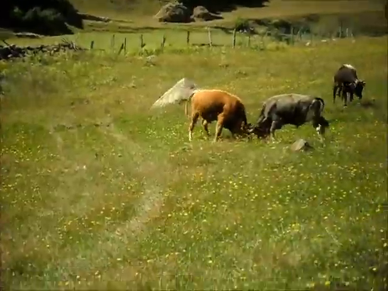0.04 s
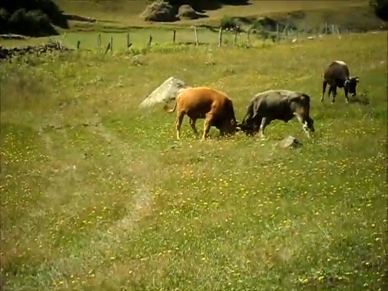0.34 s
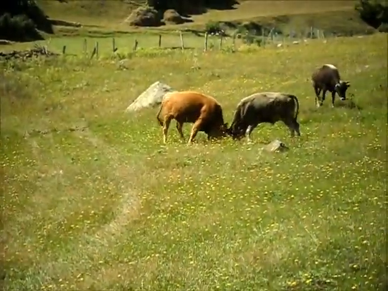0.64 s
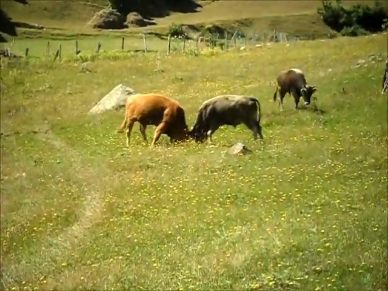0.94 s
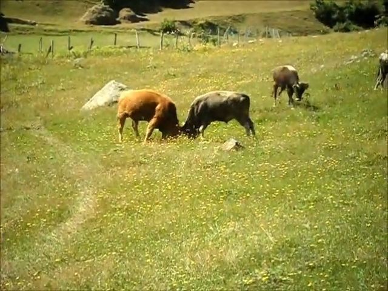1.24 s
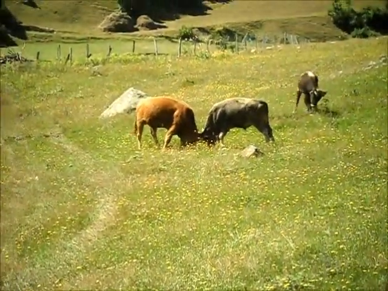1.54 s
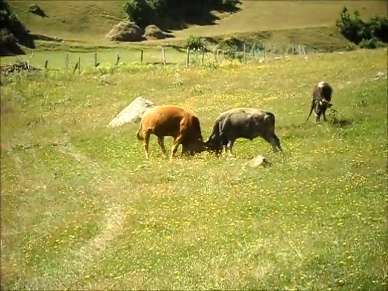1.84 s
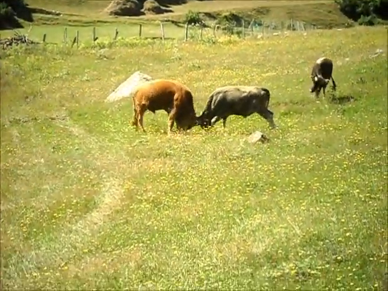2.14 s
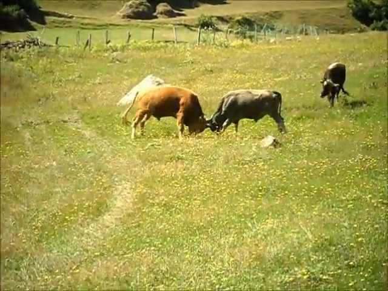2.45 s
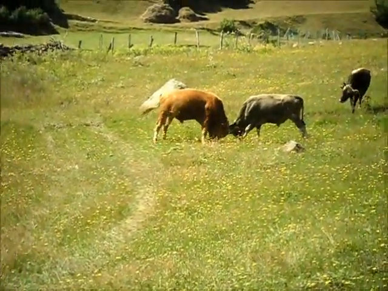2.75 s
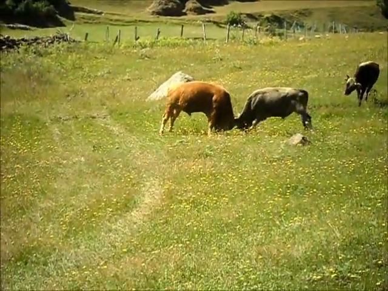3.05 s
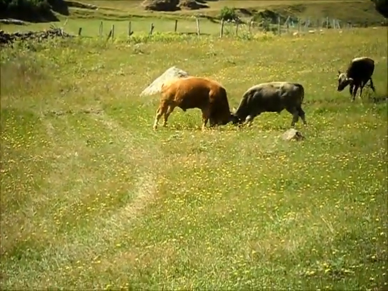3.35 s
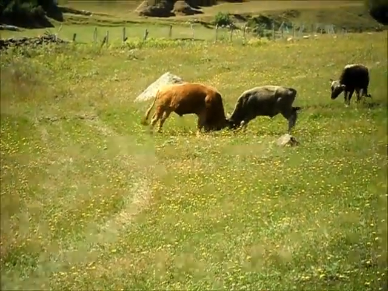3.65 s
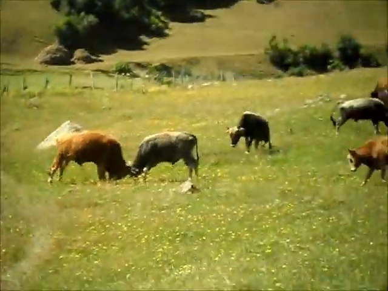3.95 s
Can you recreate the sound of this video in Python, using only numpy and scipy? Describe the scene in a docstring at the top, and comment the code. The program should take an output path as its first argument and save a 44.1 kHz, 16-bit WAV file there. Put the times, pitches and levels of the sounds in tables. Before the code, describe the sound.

Cattle mooing, one rising high and another holding a brassy note, in a breezy pasture.

```python
"""A microphone switches on with a pop in a mountain pasture; wind bumps it and grasshoppers rasp nearby,
leg against wing. A cow's low moan climbs to a hooting falsetto, and a second cow joins with a held, brassy
note, both voiced by vocal folds sounding through nose and mouth. The first sinks away; the second cracks,
opens its mouth wide, breaks off and adds a soft hum, blurred by the hillside. Last come a sharp gust
and a few tiny handling ticks."""
import sys
import numpy as np
from scipy import signal
from scipy.fft import rfft, irfft
from scipy.io import wavfile
from scipy.ndimage import uniform_filter1d

SR = 44100
rng = np.random.default_rng(int(sys.argv[2]) if len(sys.argv) > 2 else 0)


def materialize(psi):
    """Save the field psi as 16-bit PCM at rate SR to the path in sys.argv[1].

    A 1-D psi becomes a single channel; in a 2-D psi each row is a channel.
    """
    bounded = np.clip(np.atleast_2d(psi).T, -1, 1)
    quanta = np.round(bounded * 32767).astype(np.int16)
    wavfile.write(sys.argv[1], SR, quanta)


N = 176400
T = np.arange(N) / SR

# The second cow's nasal tone, in bellow and hum. Each row: frequency in Hz, gain in dB.
SECOND_COW_NOSE = [(200,1),(290,1.5),(570,-24),(850,-20)]


def from_db(db):
    """Decibels to gain."""
    return 10 ** (np.asarray(db) / 20)


def rms_one(x):
    """Scale to unit rms."""
    return x / np.sqrt(np.mean(x ** 2) + 1e-20)


def in_time(rows):
    """One automation curve for each column after the time."""
    times, *columns = np.transpose(rows)
    return [np.interp(T, times, column) for column in columns]


def swell(peak_s, half_s):
    """A bell-shaped envelope, down to 1/e at half_s either side of its peak."""
    return np.exp(-((T - peak_s) / half_s) ** 2)


def at_hz(points, hz):
    """Gain of an EQ curve at the given frequencies."""
    freqs, db = np.transpose(points)
    return from_db(np.interp(np.log(hz + 1), np.log(freqs), db))


def colour(x, points):
    """Shape a signal with an EQ curve."""
    return irfft(rfft(x) * at_hz(points, np.arange(N // 2 + 1) * SR / N), N)


def noise(points):
    """Coloured noise of unit rms."""
    return rms_one(colour(rng.standard_normal(N), points))


def drift(rate_hz):
    """Smooth random modulation of unit rms."""
    pole = np.exp(-2 * np.pi * rate_hz / SR)
    return rms_one(signal.lfilter([1], [1, -2 * pole, pole * pole], rng.standard_normal(N + SR))[SR:])


def air():
    """A bed of far hiss, with a faint low drone and a soft rush before the calls."""
    # The hiss's fader. Each row: time in seconds, level in dB.
    hiss_level = [(0,-66),(1.0,-66),(2.2,-62),(4,-62)]
    # Three noise colours. Each row: frequency in Hz, relative level in dB.
    hiss_eq = [(180, -4), (300, 0), (520, -4), (1100, -6), (4300, -12), (5790, -9.5), (10500, -16)]
    drone_eq = [(170,-13.5),(290,1),(420,-13),(800,-38)]
    rush_eq = [(200,-11.5),(600,-13),(1100,-4),(1600,-34)]
    hiss_db, = in_time(hiss_level)
    drone = from_db(-59.5) * swell(peak_s=0.1, half_s=0.12) * noise(drone_eq)
    rush = from_db(-66) * swell(peak_s=0.28, half_s=0.11) * noise(rush_eq)
    return from_db(hiss_db) * noise(hiss_eq) + drone + rush


def wind():
    """Low buffeting on the microphone: a light breeze with short gusts."""
    # The breeze's fader. Each row: time in seconds, level in dB.
    breeze = [(0,-66),(.8,-62),(1.5,-46.5),(2.1,-49.5),(2.35,-65.5),(3.1,-54),(4,-58.5)]
    # Bumps of wind. Each row: peak time in seconds, level in dB, half-length in seconds.
    gusts = [(0.4,-37,0.022),(0.464,-39,0.042),(1.2,-36,0.024),(1.32,-46,0.0059),(1.533,-43,0.046),(1.64,-31.5,0.037),(1.749,-45,0.043),(2.107,-34,0.0056),(2.172,-39.5,0.025),(2.859,-41,0.023),(3.19,-46,0.061),(3.297,-41,0.0072),(3.495,-26,0.02),(3.695,-50.5,0.032),(3.899,-57,0.015)]
    # The rumble's colour. Each row: frequency in Hz, relative level in dB.
    rumble_eq = [(15,-1),(35,4.5),(90,-3.5),(130,-12.5),(200,-15.5),(600,-52),(1500,-74)]
    breeze_db, = in_time(breeze)
    force = from_db(breeze_db + 5.1 * drift(8.2))
    force += sum(from_db(db) * swell(s, half) for s, db, half in gusts)
    eddies = noise(rumble_eq)
    eddy_level = np.sqrt(uniform_filter1d(eddies ** 2, size=2200) + 0.17)
    return force * eddies / eddy_level  # evened out, so the force shapes the bumps


def handling_ticks():
    """Tiny dry ticks of the microphone's casing."""
    # Each row: start in seconds, level in dB.
    ticks = [(3.75,-44),(3.831,-56),(3.967,-54.5)]
    # The casing's colour. Each row: frequency in Hz, relative level in dB.
    casing_eq = [(700,-25),(2200,5),(3000,-11),(3900,8),(6000,-5),(10000,-18)]
    decay_s = 0.002
    envelope = sum(from_db(db) * (T > s) * np.exp(-np.abs(T - s) / decay_s) for s, db in ticks)
    return envelope * noise(casing_eq)


def grasshoppers():
    """Each chirp is an uneven up-stroke and down-stroke of a leg dragging its teeth over the wing."""
    # Each row: start in seconds, level in dB.
    chirps = [(0.146,-68.5),(0.574,-59),(0.641,-61.5),(.935,-69.5),(1.163,-58),(1.255,-65),(1.626,-58),(1.801,-57.5),(2.071,-50.5),(2.41,-60),(2.652,-52),(2.905,-52),(3.104,-56),(3.271,-63),(3.482,-59.5),(3.57,-51.5),(3.822,-54.5),(3.93,-60)]
    # The wing's colour. Each row: frequency in Hz, relative level in dB.
    wing_eq = [(3000,-25),(4800,-11.5),(5750,5.5),(6700,-3.5),(8000,-1),(10200,-2.5)]
    up_s, down_at_s, down_s, teeth_per_s = 0.012, 0.02, 0.021, 1100
    strokes = np.zeros(N)
    for start, db in chirps:
        up = (T > start) & (T < start + up_s)
        down = (T > start + down_at_s) & (T < start + down_at_s + down_s)
        strokes += from_db(db) * (up | down)
    tooth_rate = teeth_per_s * np.exp(0.21 * drift(300))
    teeth_passed = np.floor(np.cumsum(tooth_rate) / SR)
    clicks = np.diff(teeth_passed, prepend=0) * from_db(2.3 * rng.standard_normal(N))
    envelope = uniform_filter1d(strokes, size=280) * from_db(3.1 * drift(47))
    return envelope * rms_one(colour(clicks, wing_eq))


def hillside(x, wet_db=-18.5, t60_s=0.22):
    """The slopes return a faint, short scatter."""
    tail = rng.standard_normal(N) * from_db(-60 * T / t60_s) * (T > .01)
    return from_db(wet_db) * signal.fftconvolve(x, tail / np.linalg.norm(tail))[:N]


def voice(span, pitch, paths, jitter, shimmer_db, subharmonic_db, rasp_db=0, shift=np.ones(N)):
    """Vocal-fold harmonics and pulsed breath. Paths are (gain in dB, EQ): the nose, then the mouth's."""
    nose_fall_db = -15.5  # per harmonic above the second
    flutter_db, flutter_full_at = 5, 13  # overtones waver on their own, fully from this harmonic up
    pitch = pitch * (1 + jitter * drift(48.0))
    phase = 2 * np.pi * np.cumsum(pitch) / SR
    on = (T > span[0][0]) & (T < span[-1][0])  # from the span's first row to its last
    (nose_gain, nose_eq), *mouths = [(from_db(db)[on], eq) for db, eq in paths]
    flutter_times = np.linspace(0, T[-1], num=60)
    tone = np.zeros(N)
    for k, start_phase in enumerate(rng.uniform(0, 2 * np.pi, size=36), 1):
        hz = k * pitch[on]
        nose = nose_gain * at_hz(nose_eq, hz) * from_db(nose_fall_db * max(k - 2, 0))
        mouth = sum(gain * at_hz(eq, hz / shift[on]) for gain, eq in mouths)
        depth_db = flutter_db * min(k / flutter_full_at, 1) ** 2
        flutter = from_db(depth_db * np.interp(T[on], flutter_times, rng.standard_normal(size=60)))
        tone[on] += np.sqrt(2) * (nose + mouth) * flutter * np.sin(k * phase[on] + start_phase)
    tone *= from_db(shimmer_db * drift(26))
    tone *= 1 + from_db(subharmonic_db) * drift(10.3) * np.cos(phase / 2)  # growl between the harmonics
    breath = sum(from_db(db + rasp_db) * noise(eq) for db, eq in paths[1:])
    return tone + on * breath * (1 + np.cos(phase))


def hum():
    """The second cow's short hum with the mouth shut, blurred by extra scatter from the hillside."""
    # Each row: time in seconds, pitch in Hz, nose gain in dB.
    contour = [(3.0,225.4,-65),(3.08,264.6,-57),(3.21,272,-56),(3.265,238,-71)]
    pitch, nose_db = in_time(contour)
    direct = voice(contour, pitch, [(nose_db, SECOND_COW_NOSE)],
                   jitter=0.034, shimmer_db=2.0, subharmonic_db=-11.0)
    return direct + from_db(7.5) * hillside(direct)


def held_bellow():
    """The second cow's brassy note slides in, cracks into a squeezed falsetto, catches and opens wide."""
    # The melody. Each row: time in seconds, pitch in Hz.
    melody = [(1.07, 217), (1.15, 232.6), (1.225, 266.1), (1.512, 271.3), (1.584, 282.6), (1.83, 290.7),
              (2.078, 278.3), (2.2, 287.6), (2.224, 306), (2.246, 317.6), (2.262, 301.5), (2.356, 294.6),
              (2.385, 277.5), (2.454, 286.3), (2.718, 274), (2.77, 277), (2.882, 277), (2.902, 271.3),
              (2.935, 219)]
    # The push behind it. Each row: time in seconds, nose gain in dB, mouth gain in dB.
    effort = [(1.03,-75,-77),(1.14,-57,-56),(1.24,-56,-59.5),(1.45,-58,-53.5),(1.8,-45.5,-47),(2.07,-49,-44.5),(2.2,-45.5,-48.5),(2.228,-40.5,-58),(2.35,-39.5,-60.5),(2.385,-45,-46.5),(2.46,-43.5,-50.5),(2.72,-47,-42),(2.87,-43.5,-45.5),(2.912,-50,-43.5),(2.935,-56,-63.5),(2.95,-77,-110)]
    # Hoarseness. Each row: time in seconds, breath against the overtones in dB.
    hoarseness = [(1.3,-10),(2.2,-23),(2.245,4),(2.275,-2),(2.355,-10),(2.39,-17),(2.89,-30),(2.93,7)]
    # Breaks in the voice. Each row: peak time in seconds, half-length in seconds, strength from 0 to 1.
    cracks = [(2.25,0.015,0.99),(2.456,0.024,0.36),(2.742,0.039,0.31)]
    # Two mouth shapes and the ring of the tight throat. Each row: frequency in Hz, gain in dB.
    half_open_eq = [(280,-33),(560,-10.5),(850,-20.5),(1130,-4),(1420,-7),(1700,-2),(1980,-21),(2280,-10.5),(2560,-12),(2850,-18.5),(3100,-23),(3400,-34),(3700,-29.5),(4200,-43),(4550,-27),(4870,-46),(5150,-27),(5800,-28),(7000,-50),(10500,-38)]
    wide_open_eq = [(280,-53),(560,-7),(840,-18.5),(1110,-0.5),(1400,-3.5),(1680,-3),(1950,-8),(2230,-2.5),(2520,-11.5),(2800,-9),(3080,-25),(3800,-36.5),(4450,-32.5),(5000,-50),(6300,-27.5),(7000,-40.5),(10500,-38)]
    throat_eq = [(2150,-42),(2700,0),(3300,-17),(3800,-26)]
    squeeze_s, squeeze_half_s = 2.275, 0.082
    opens_from_s, opens_to_s = 1.93, 2.6
    pitch, = in_time(melody)
    nose_db, mouth_db = in_time(effort)
    rasp_db, = in_time(hoarseness)
    crack = sum(strength * swell(s, half) for s, half, strength in cracks)
    squeeze_db = -64 - 10 * ((T - squeeze_s) / squeeze_half_s) ** 2
    opening = np.clip((T - opens_from_s) / (opens_to_s - opens_from_s), 1e-4, 1 - 1e-4)
    paths = [(nose_db - 8 * crack ** 2, SECOND_COW_NOSE),
             (mouth_db + 20 * np.log10(1 - opening), half_open_eq),
             (mouth_db + 20 * np.log10(opening), wide_open_eq),
             (squeeze_db, throat_eq)]
    formant_shift = (pitch / 270.4) ** 0.17  # the mouth's resonances rise with pitch
    return voice(effort, pitch, paths, jitter=0.0014 + 0.043 * crack ** 2, shimmer_db=0.5,
                 subharmonic_db=-51 + 38.5 * np.sqrt(crack), rasp_db=rasp_db, shift=formant_shift)


def rising_bellow():
    """The first cow's moan climbs into a nearly pure hoot with hoarse overtones, then sinks back."""
    # The melody. Each row: time in seconds, pitch in Hz.
    melody = [(.45,112.7),(.57,122.6),(.69,144.8),(.72,163.6),(.9,202.1),(1.01,228.2),(1.1,270),(1.17,294.8),(1.21,324.7),(1.39,340.6),(1.59,343.7),(1.71,336),(1.79,300.6),(1.9,280.4),(1.95,244),(2.04,149)]
    # The push behind it. Each row: time in seconds, nose gain in dB, mouth gain in dB.
    effort = [(.42,-99,-92),(.48,-51.5,-94),(.68,-51,-80),(.8,-52.5,-73),(.95,-50.5,-60.5),(1.075,-48,-57),(1.2,-34,-62.5),(1.42,-38,-54),(1.58,-37,-57),(1.72,-31,-64.5),(1.82,-35,-56.5),(1.97,-44.5,-84),(2.01,-44,-85),(2.05,-65,-87)]
    # Hoarseness. Each row: time in seconds, breath against the overtones in dB, subharmonic depth in dB.
    hoarseness = [(.5,2,-17),(1.02,-3.5,-18),(1.15,-3,-30),(1.4,-2,-20.5),(1.65,0,-17.5),(2.0,-1,-29)]
    # Resonances of nose and mouth. Each row: frequency in Hz, gain in dB.
    nose_eq = [(115,-28),(165,0),(250,-1.5),(370,-0.5),(510,-3.5),(545,-19),(660,-36.5)]
    mouth_eq = [(300,-3),(650,-25),(880,-13),(1030,-9.5),(1230,-8.5),(1380,3),(1560,-1.5),(1750,-8.5),(2150,-13.5),(2450,-13.5),(3000,-14.5),(3500,-33),(4250,-15),(4900,-29),(6200,-25.5),(10500,-47)]
    pitch, = in_time(melody)
    nose_db, mouth_db = in_time(effort)
    rasp_db, subharmonic_db = in_time(hoarseness)
    paths = [(nose_db, nose_eq), (mouth_db, mouth_eq)]
    formant_shift = (pitch / 350) ** 0.14  # the mouth's resonances rise with pitch
    return voice(effort, pitch, paths, jitter=0.00623, shimmer_db=0.4,
                 subharmonic_db=subharmonic_db, rasp_db=rasp_db, shift=formant_shift)


def scene():
    """The mono mix: cattle and their scatter over wind, insects, ticks and far hiss."""
    cattle = rising_bellow() + held_bellow() + hum()
    return np.array([cattle + hillside(cattle) + wind() + grasshoppers() + handling_ticks() + air()])


def record(dry):
    """The microphone switches on with a pop, a step that settles; a steep low-pass cuts the top."""
    switch_on_s, settle_s, cutoff_hz = 0.05, 0.23, 10750
    pop = from_db(-18.5) * np.exp(-np.abs(T - switch_on_s) / settle_s)
    live = (T >= switch_on_s) * (dry + pop)
    return signal.sosfilt(signal.ellip(10, .3, 70, cutoff_hz, fs=SR, output="sos"), live)


dry = scene()
out = record(dry)
materialize(out)
```